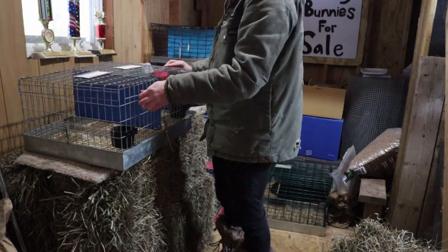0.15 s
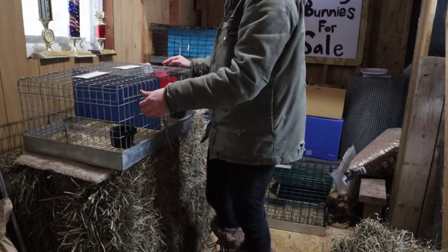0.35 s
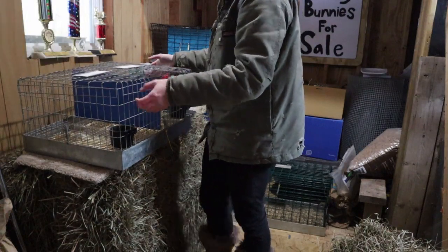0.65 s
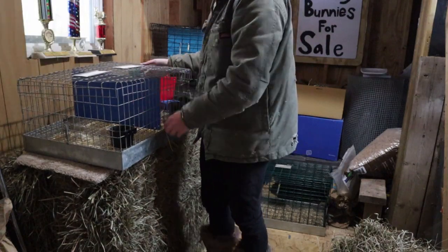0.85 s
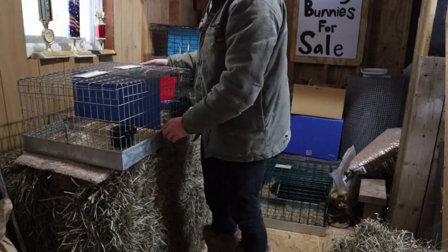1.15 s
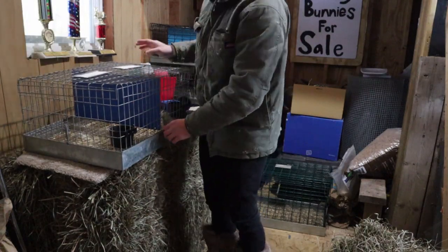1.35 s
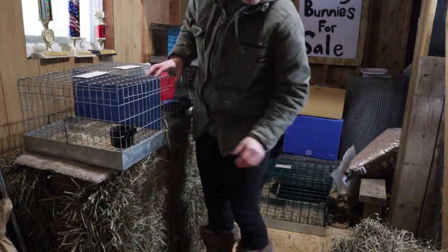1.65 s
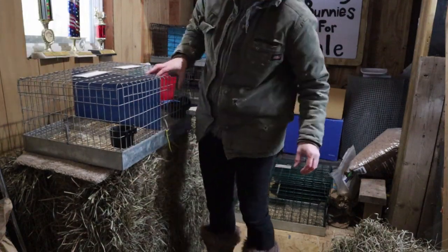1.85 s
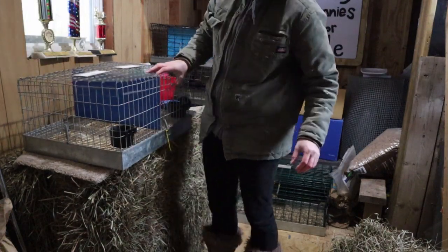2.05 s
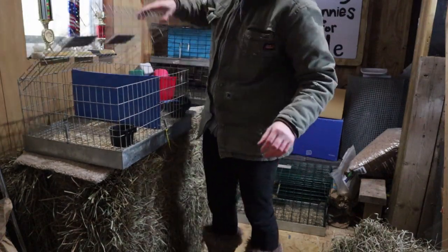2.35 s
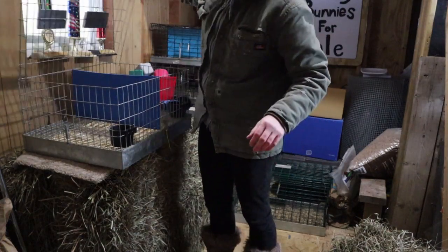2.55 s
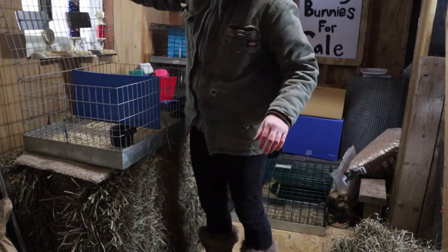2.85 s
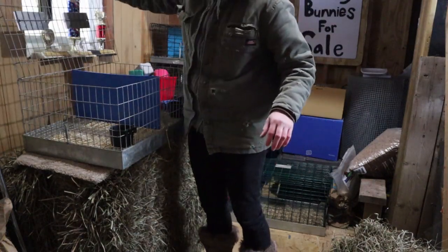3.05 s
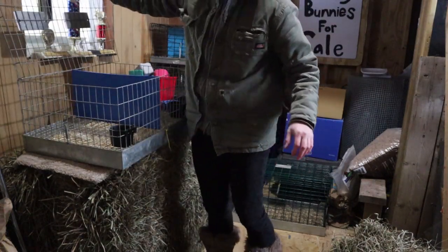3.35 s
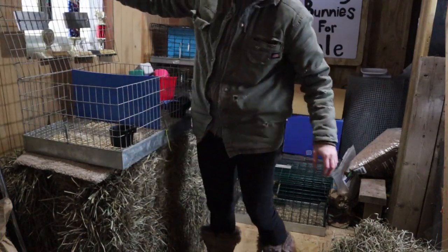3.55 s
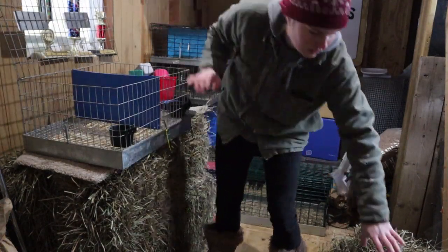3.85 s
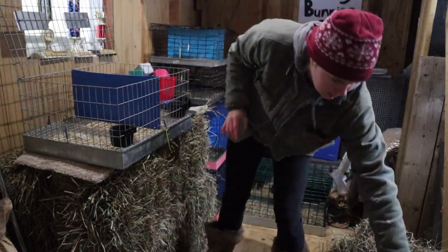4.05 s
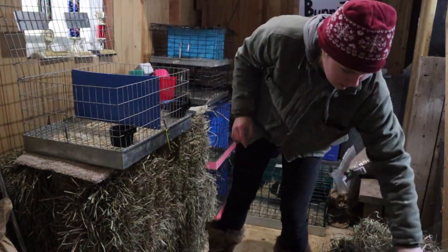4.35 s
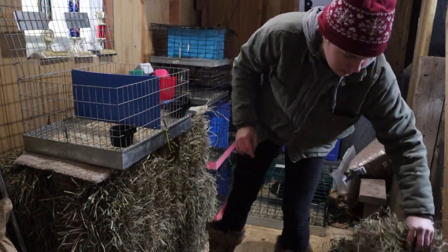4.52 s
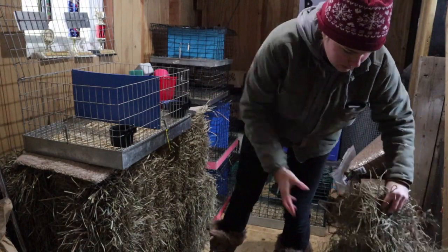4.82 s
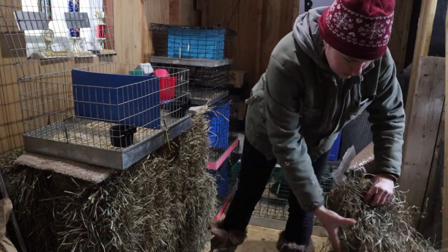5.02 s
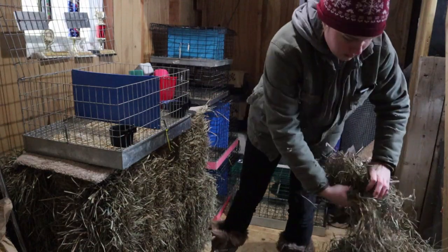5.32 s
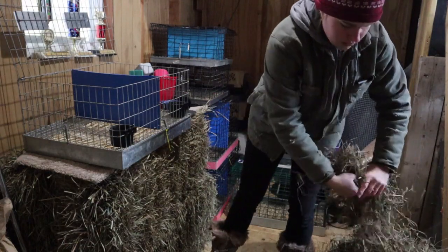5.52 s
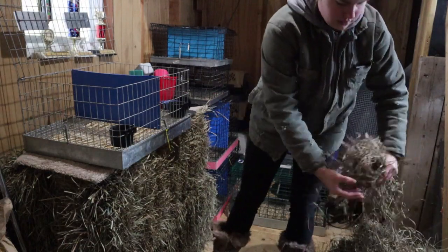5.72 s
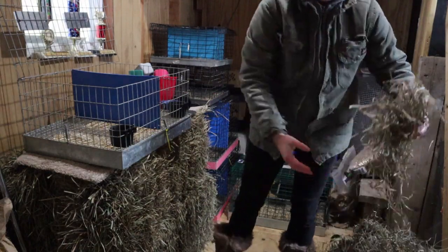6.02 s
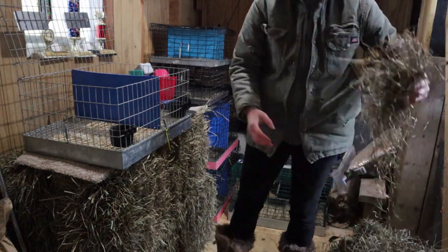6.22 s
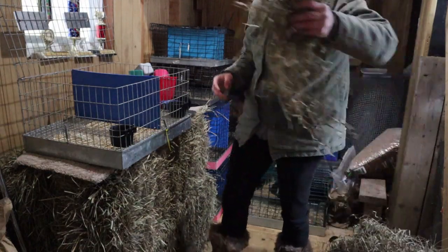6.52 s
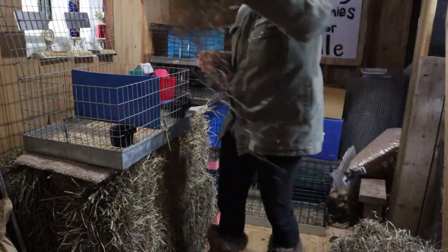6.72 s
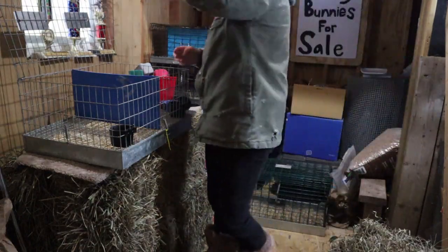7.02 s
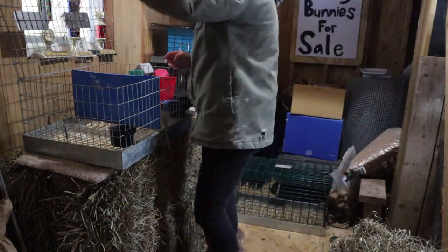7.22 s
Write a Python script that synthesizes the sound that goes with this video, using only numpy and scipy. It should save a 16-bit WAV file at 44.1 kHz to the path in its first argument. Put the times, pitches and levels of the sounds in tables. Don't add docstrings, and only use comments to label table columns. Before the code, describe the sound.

Close in a small wooden shed over a faint low hush, loose mesh clatters brightly, then quiets to small latch clacks. More wire rattling leads to one loud boomy bang of the lid against boards. Boots shift dully, a hand grips hay and tears it with dense dry fizz, twice, before faint stalk rustles, clicks and floor thuds. Wide stereo treble, mostly centred bass, short room decay.

```python
import sys
import numpy as np
from scipy import signal
from scipy.fft import rfft, irfft, next_fast_len
from scipy.io import wavfile
from scipy.ndimage import uniform_filter1d

SR = 44100
rng = np.random.default_rng(int(sys.argv[2]) if len(sys.argv) > 2 else 0)


def wav_out(sig):
    wavfile.write(sys.argv[1], SR, np.round(np.clip(np.atleast_2d(sig).T, -1, 1) * 32767).astype(np.int16))


def gain_from_db(level_db):
    decades = np.asarray(level_db, float) / 20
    return 10 ** decades


N = 325458


def evened(x):
    return x / np.sqrt(np.mean(x ** 2, axis=-1, keepdims=True) + 1e-20)


def read(points, hz):
    f, value = np.transpose(points)
    return np.interp(np.log(hz + 1), np.log(f + 1), value)


def coloured(x, points, turn=0.):
    size = next_fast_len(N)
    gain = gain_from_db(read(points, np.fft.rfftfreq(size, 1 / SR)))
    return irfft(rfft(x, size) * gain * np.exp(1j * turn), size)[..., :N]


def ring(x, hz, width):
    r = np.exp(-np.pi * width / SR)
    turn = 2 * np.pi * hz / SR
    return signal.lfilter([np.sin(turn) * 2 * np.sqrt(1 - r)], [1, -2 * r * np.cos(turn), r * r], x)


def swell(s, db, t60, rise):
    t = np.maximum(np.arange(N) / SR - s, 0)
    decay = gain_from_db(db - 60 * t / max(t60, .01))
    onset = 1 - np.exp(-t / max(rise, 1e-4))
    contact = 1 + 0.24 * np.exp(-t / 0.0018)
    return decay * onset * contact


def random_hits(per_s, spread_db):
    return gain_from_db(spread_db * np.minimum(rng.exponential(1, N), 5)) * (rng.random(N) < per_s / SR)


def chatter(per_s, spread_db, bed):
    bursts = evened(signal.lfilter([1], [1, -.975], random_hits(per_s, spread_db)))
    return evened((bed + bursts) * rng.standard_normal((2, N)))


def wander(depth_db, size):
    chance = uniform_filter1d(uniform_filter1d(rng.standard_normal(N), size), size)
    return gain_from_db(depth_db * np.tanh(evened(chance)))


def patchy(x, depth_db, size=512):
    z = signal.stft(x, nperseg=size)[2]
    chance = rng.standard_normal(z.shape)
    patches = uniform_filter1d(uniform_filter1d(chance, size=3, axis=1), size=4, axis=2)
    return signal.istft(z * gain_from_db(depth_db * patches / patches.std()), nperseg=size)[1][:, :N]


def struck(s, modes, rise):
    t = np.arange(N) / SR - s
    out = np.zeros((2, N))
    at = slice(round(s * SR), round(s * SR) + SR)
    for hz, db, t60 in modes:
        start = rng.random((2, 1)) * [[.1], [1]]
        out[:, at] += swell(s, db, t60, rise)[at] * np.sin(2 * np.pi * (hz * t[at] + start))
    return out


# frequency in Hz, side over mid in dB.
WIDE = [(60, -57), (150, -30), (300, -15), (550, -9.5), (1000, -4), (2000, 1.5), (4000, 5), (9000, 7.5),
        (12000, 8), (15500, 3.5)]


def ports(pair, aim, turn, wide=WIDE):
    aim = np.clip(aim, 0, 1)
    side = aim * coloured(pair[0], wide, turn) + np.sqrt(1 - aim ** 2) * coloured(pair[1], wide)
    return np.array([pair[0] + side, pair[0] - side])


# start in seconds, tray ring in dB, wire jingle in dB over ring,
# 60 dB decay in seconds.
JOLTS = [
    (0.1135, -10.5, -3.5, 0.21),
    (0.168, -25, -9, 0.26),
    (0.889, -39.5, -15.5, 0.49),
    (0.947, -27, -29, 0.063),
    (1.729, -21, -10.5, 0.34),
    (1.799, -29, -18, 0.39),
    (1.989, -25.5, -14, 0.41),
    (2.215, -23, -18, 0.25),
    (2.639, -40.5, -14, 0.35),
]
# start in seconds, tray ring in dB, wire jingle in dB over ring.
SHAKES = [(0.004, -33, -30), (0.057, -23, -16), (0.081, -18.5, -13), (0.098, -20, -3), (0.134, -14.5, -8),
          (0.209, -22, -19), (0.243, -22, -15.5), (0.279, -34.5, -14), (0.529, -39.5, -10),
          (1.68, -50.5, 5.5), (1.769, -28, -9), (2.029, -25.5, -33), (2.131, -23, -14.5), (2.24, -27.5, -4),
          (2.27, -22.5, -6.5), (2.291, -30, -8), (2.399, -34, -13), (2.469, -58, 9.5), (2.53, -61, 13),
          (2.59, -58.5, 9), (2.679, -36.5, -31), (2.995, -16, -8), (3.027, -42, -15), (7.317, -40, -17)]
# frequency in Hz, width in Hz, level in dB.
TRAY = [(546, 38, -2.5), (659, 100, -2), (840, 190, -6), (1564, 38, -10), (1101, 34, -1.5),
        (1150, 110, -6.5)]
# frequency in Hz, width in Hz, level in dB.
WIRE = [(3250, 56, -7), (4160, 60, -8), (4530, 60, -11), (5020, 42, -8), (5680, 170, -3), (5920, 52, -9),
        (6960, 130, -6), (7280, 56, -9), (7940, 82, -6), (8440, 47, -8), (9640, 87, -7), (10200, 63, -8),
        (10500, 71, -6), (10900, 43, -7), (11500, 61, -12), (11800, 51, -8), (12100, 71, -11),
        (12500, 52, -15)]
# frequency in Hz, level in dB.
SHEET = [(120, -6), (250, 3), (500, 17), (900, 9), (1400, -0.5), (2000, -34)]
# frequency in Hz, level in dB.
CLACK = [(250, -69), (450, -43), (900, 2.5), (1800, 4), (3000, -5), (4200, -23.5)]
# frequency in Hz, level in dB.
JINGLE = [(1900, -42), (3200, -9.5), (4500, 2), (5600, -0.5), (6500, -0.5), (9500, -4.5), (11800, -14.5),
          (12700, -14), (13400, -36), (15500, -62)]


def cage():
    jolt_rise_s, shake_rise_s, shake_t60_s = 0.0097, 0.021, 0.3
    clack_db, clack_per_jingle = -1.5, 0.63
    tray, clack, jingle = np.zeros((3, N))
    moves = [(*row, jolt_rise_s) for row in JOLTS]
    moves += [(*row, shake_t60_s, shake_rise_s) for row in SHAKES]
    for s, db, jingle_db, t60, rise in moves:
        tray += swell(s, db - 12.0, t60, rise) ** 2
        if abs(s - BANG[0][0]) > .1:
            clack += swell(s, db + clack_db + clack_per_jingle * jingle_db - 3.5, t60, rise) ** 2
        jingle += swell(s, db + jingle_db - 4.5, 0.7 * t60, 0.89 * rise) ** 2
    drive = chatter(820, 1.0, bed=10.0)
    pan = gain_from_db(-6.0) * evened(coloured(drive, SHEET)) * np.sqrt(tray)
    for hz, width, db in TRAY:
        pan += gain_from_db(db - 5) * ring(drive * np.sqrt(tray) * wander(2.9, size=400), hz, width)
    wires = np.zeros((2, N))
    for hz, width, db in WIRE:
        wires += gain_from_db(db - 7) * ring(drive * np.sqrt(jingle) * wander(6, size=700), hz, width)
    mesh = evened(coloured(drive, CLACK)) * np.sqrt(clack)
    mesh += gain_from_db(1.0) * evened(coloured(drive, JINGLE)) * np.sqrt(jingle)
    return ports(pan + wires + mesh, 0.28, 1.23)


# start in seconds, level in dB.
BANG = [
    (2.987, 0),
]
# frequency in Hz, level in dB, 60 dB decay in seconds.
WALL = [(85.9, -22, 0.89), (111, -17.5, 0.69), (125.6, 3.5, 0.306), (149, 10, 0.125), (162, 0, .22),
        (175.5, -13, 0.31), (186.7, 1.5, 0.23), (224, -18, 0.63), (235.6, -8.5, 0.43), (291.3, 4, 0.2),
        (316, -16.5, 0.64), (357, -15, 0.37), (447, -16, 0.44), (2500, -23, 0.41), (496, -10, 0.25),
        (639, -6, 0.16), (800, -9, 0.12)]
# frequency in Hz, level in dB.
SLAP = [(180, -21), (300, -10), (364, -13.5), (649, -19), (726, -20), (813, -17.5), (2390, -23),
        (2990, -26), (9830, -43), (12100, -60), (14000, -94)]
# frequency in Hz, 60 dB decay in seconds.
SLAP_T60 = [(300, 0.47), (1000, 0.32), (2500, 0.28), (6000, 0.27), (12000, 0.17)]


def bang():
    s, db = BANG[0][0] + 0.00188, BANG[0][1]
    out = struck(s + 0.00019, [(hz, db + d - 12.0, t60) for hz, d, t60 in WALL], 0.0078)
    slap = coloured(rng.standard_normal((2, N)), SLAP)
    for hz in np.geomspace(300, 12000, num=9):
        split = signal.butter(2, [hz / 1.206, hz * 1.23], "bandpass", fs=SR, output="sos")
        out += signal.sosfilt(split, slap) * swell(s, db + 12.5, read(SLAP_T60, hz), 0.0011)
    return ports(out, 0.15, 2.0)


# start in seconds, level in dB, clack in dB over knock,
# hiss in dB over knock.
LATCHES = [
    (0.714, -41, 6, -20),
    (1.042, -34.5, 11, -6.5),
    (1.049, -32, 0, -17),
    (1.086, -41, -11, -41),
    (1.226, -39, 3, -18),
    (1.604, -34.5, 2, -34),
]
# start in seconds, level in dB, pitch in Hz, hiss in dB over knock.
KNOCKS = [(3.463, -37.5, 1100, -27), (3.469, -28, 650, -34), (3.507, -43, 620, -22),
          (3.605, -39.5, 645, -14), (3.773, -39, 520, -18), (3.904, -35.5, 447, -13.5),
          (3.84, -39.5, 890, -30), (3.98, -39, 800, -28), (4.2, -33, 400, -30), (4.3, -37, 340, -30),
          (6.252, -37, 800, -23), (6.272, -41, 930, -20), (6.336, -53, 1280, 11), (6.488, -39.5, 840, -38),
          (6.53, -41, 880, -36), (6.688, -33, 600, -18), (6.805, -47, 605, -9), (6.919, -48, 405, -6),
          (7.086, -46.5, 1040, 11), (7.229, -66, 428, 19)]


def knocks():
    latch_hz, latch_t60_s, knock_t60_s, rise_s = 573, 0.2, 0.21, 0.0079
    scuff_db, scuff_per_hiss = 4, 0.41
    edge = 1
    drive = chatter(540, 1.4, bed=2.0)
    clack, hiss = evened(coloured(drive, CLACK)), evened(coloured(drive, JINGLE))
    body = evened(coloured(drive, SHEET))
    out = np.zeros((2, N))
    rows = [(s, db, latch_hz, clack_db, hiss_db, latch_t60_s) for s, db, clack_db, hiss_db in LATCHES]
    for s, db, hz, hiss_db in KNOCKS:
        rows.append((s, db, hz, scuff_db + scuff_per_hiss * hiss_db, hiss_db, knock_t60_s))
    for s, db, hz, clack_db, hiss_db, t60 in rows:
        at = slice(round(s * SR), round(s * SR) + SR // 2)
        blow = swell(s, db - 8, t60, rise_s * gain_from_db(-edge * max(hiss_db, 0)))[at]
        surface = 0.12 * body[:, at] + gain_from_db(clack_db) * clack[:, at] + gain_from_db(hiss_db) * hiss[:, at]
        out[:, at] += ring(drive[:, at] * blow, hz, 92) + blow * surface
    return ports(out, 0.32, 1.6)


# start in seconds, # level in dB,
# pitch in Hz, bright crack in dB, 60 dB decay in seconds.
TICKS = [(0.713, -31.5, 3920, -34, 0.15), (0.714, -31, 1500, -34, 0.065), (0.9498, -26, 1010, -30, .025),
         (1.03, -28, 2130, -44, 0.052), (1.029, -42, 7500, -40, 0.021), (1.046, -33, 12000, 0, .03),
         (1.223, -47, 9000, -4, 0.065), (0.114, -4, 1700, -6, 0.036), (0.119, -12, 5670, -11, 0.05),
         (0.134, -21, 4300, -8, .02), (0.148, -15, 2500, -8, 0.018), (1.735, -32, 2080, -8, .03),
         (1.777, -29, 3000, -8, .02), (1.991, -29, 5840, -10, 0.037), (2.148, -40, 1800, -5, .04),
         (2.224, -21, 1520, -12, .03), (2.9885, -1, 1400, -36, 0.053), (2.992, -22.5, 5660, -28, 0.29),
         (2.245, -21, 1600, -10, 0.022), (2.29, -31, 2800, -8, .02), (2.312, -34, 1800, -8, .02),
         (3.468, -44, 4000, -22, 0.48), (3.61, -53, 9000, -4, 0.018), (3.784, -29, 8000, -4, .015),
         (3.904, -35, 4500, -13, .02), (4.114, -30, 2200, -15, .04), (4.487, -32, 4800, -14, .05),
         (6.332, -21.5, 1960, 1.5, 0.016), (6.337, -29, 12000, -3, .012), (6.553, -40, 2340, -4, .015),
         (6.693, -27, 1090, -30, 0.027), (6.728, -33, 10600, -2, .015), (6.809, -32, 1300, -22, 0.061),
         (6.892, -39, 10000, -4, 0.036), (6.955, -32, 3250, -2, .015), (7.073, -38, 11300, -6, .012),
         (7.088, -43, 7000, 0, .02), (7.097, -41, 5200, -8, 0.022), (7.227, -41, 3300, 0, .015),
         (0.122, -17, 7500, -6, 0.018), (0.139, -20, 1300, -10, 0.018), (0.158, -18, 2200, -8, .02),
            (0.183, -28, 1500, -8, 0.018), (1.052, -24, 1900, -14, .04), (1.076, -30, 1700, -14, .03),
            (1.09, -30, 2200, -14, .03), (1.805, -35, 2200, -8, .02), (2.217, -26, 900, -14, .03),
            (0.119, -6, 1400, -10, 0.036), (0.147, -12, 800, -14, .04), (1.732, -30, 13000, -3, 0.097),
            (1.99, -40, 13500, -5, .05), (1.223, -50, 13000, -6, .06), (1.044, -22, 1800, -14, 0.033),
            (2.125, -44, 12000, -4, .08), (3.0, -23, 3600, -16, 0.16), (3.471, -26, 670, -33, .05),
            (4.092, -36, 1870, -25, 0.086), (4.128, -23, 1700, -25, 0.087), (4.15, -28, 1900, -25, .06),
            (6.692, -38, 1800, -25, 0.018), (0.1, -20, 9500, -4, .04), (0.118, -10, 10800, -4, .05),
            (7.248, -39, 3700, 0, .012), (7.277, -36, 9800, -8, .015)]
# frequency in Hz, level in dB.
CRACK = [(1900, -41), (3200, -6), (4500, -1), (6500, -3), (9500, -3), (12500, -8), (14000, -26),
         (15500, -41)]


def ticks():
    drive, out = rng.standard_normal((2, N)), np.zeros((2, N))
    bright = evened(coloured(drive, CRACK))
    for s, db, hz, crack_db, t60 in TICKS:
        at = slice(round(s * SR), round(s * SR) + SR // 4)
        snap = swell(s, db - 14.0, t60, 0.00043)[at]
        out[:, at] += ring(drive[:, at] * snap, hz, 0.35 * hz) + gain_from_db(crack_db) * snap * bright[:, at]
    return ports(out, 0.38, 0.67)


# start in seconds, level in dB, pitch in Hz,
# 60 dB decay in seconds.
PINGS = [(0.067, -37, 1100, 0.22), (0.083, -25.5, 1060, 0.077), (0.116, -15, 1088, 0.13),
         (0.118, -15, 5540, 0.082), (0.128, -25, 5770, 0.19), (0.118, -25, 1900, 0.14),
         (0.12, -30, 1500, 0.15), (0.121, -28, 4200, 0.17), (0.173, -23, 1084, 0.058),
         (0.266, -41, 2230, 0.13), (0.325, -43, 1084, 0.11), (0.53, -59, 5720, .4), (1.052, -39, 1900, .15),
         (1.056, -56, 2310, .15), (1.738, -31, 1110, 0.18), (1.74, -39, 2105, 0.14),
         (1.995, -33.5, 529.5, 0.29), (1.996, -37, 1092, .3), (1.999, -46, 3230, .2),
         (2.157, -37, 1117, .15), (2.214, -31, 530, .12), (2.305, -30, 1104, .1), (2.352, -41, 1136, .15),
         (2.238, -27.5, 1071, 0.22), (2.27, -42.5, 2790, 0.35), (2.288, -29, 1083, .12),
         (2.29, -37, 5900, .15), (2.52, -57, 5820, .4), (2.62, -56, 5700, 0.33), (2.63, -56, 7500, .3),
         (2.998, -33, 5920, 0.17), (3.114, -25, 171.7, 0.36), (3.12, -41.5, 521, 0.41),
         (3.876, -39, 303, 0.13), (4.093, -49.5, 519, .6), (4.113, -43, 1300, 0.18), (6.7, -49, 299, 0.13),
         (6.71, -43, 525, 0.18), (6.805, -46, 615, 0.11), (7.015, -47, 594, .1), (7.31, -53, 1068, 0.43),
         (7.34, -51, 520, .4), (6.49, -48, 840, 0.18), (6.694, -44, 1150, 0.09), (6.807, -44, 1313, 0.099),
         (6.6946, -25.5, 90, 0.061), (2.995, -25, 597, 0.13), (2.995, -30, 1162, 0.16),
         (2.225, -38, 1513, .2), (2.28, -41, 1930, 0.23), (0.2, -47, 800, 0.14), (0.949, -43, 800, 0.05)]


def pings():
    out = np.zeros((2, N))
    for s, db, hz, t60 in PINGS:
        out += struck(s, [(hz, db, t60), (1.1 * hz, db - 9.5, t60)], 0.0018)
    return ports(out, 0.25, 1.3)


# start in seconds, level in dB, pitch in Hz, upper modes in dB.
THUDS = [(0.079, -47, 157, -10), (0.119, -21.5, 161, -1), (0.219, -31, 161.5, 1.5),
         (0.713, -25.5, 155, 3.5), (0.789, -32.5, 53, 2.5), (1.765, -36, 77, 9), (1.809, -25, 83.4, 1),
         (1.915, -26, 66, 0), (1.999, -39.5, 162, 5), (2.155, -43, 172, 15), (2.25, -40, 51.7, 7),
         (2.637, -40.5, 185, 7.5), (3.099, -33, 132, -10), (3.25, -33, 109, 3.5), (3.608, -39, 76, 6),
         (3.783, -24.5, 67.5, -24), (3.87, -25, 92.5, -4), (3.938, -35, 93, -19), (4.192, -37, 77.5, 6.5),
         (4.3, -44, 192, 0), (4.38, -30.5, 173.4, -2.5), (4.558, -43.5, 164, 4), (6.146, -44, 127, -12),
         (6.301, -51, 192, 12), (6.498, -48.5, 103, 8), (6.706, -19.5, 88, -13), (6.758, -25, 91.5, -23),
         (6.81, -33, 143, -15), (6.915, -30.5, 84.5, -5.5), (7.031, -41, 80, -23), (7.248, -38.5, 127, -15)]
# frequency in Hz, level in dB.
BOARDS = [(83, 3), (128, 0.5), (165, 4), (190, 1.5), (228, -1.5), (295, -4)]


def boards():
    t60_s = 0.21
    damping = .15
    out = np.zeros((2, N))
    for s, db, hz, upper_db in THUDS:
        t60 = t60_s * gain_from_db(-damping * (db + 29.5))
        upper = [(f, db + upper_db + d - 16.0, 1.7 * t60) for f, d in BOARDS]
        out += struck(s, [(hz, db - 3.5, t60)] + upper, 0.0039)
    return ports(out, 0.296, 2.3)


# time in seconds, effort in dB.
GRAB = [
    (4.07, -80),
    (4.172, -37),
    (4.19, -35),
    (4.26, -36.5),
    (4.408, -30.5),
    (4.662, -30),
    (4.75, -32.5),
    (4.864, -31),
    (4.908, -35.5),
]
# time in seconds, effort in dB.
TEAR = [
    (5.076, -39.5),
    (5.33, -34),
    (5.472, -36),
    (5.694, -32.5),
    (5.72, -36),
    (5.804, -34.5),
    (5.918, -46),
    (6.0, -54),
    (6.1, -80),
]
# time in seconds, level in dB.
STIR = [(0.0, -70), (0.24, -62.5), (0.68, -80), (1.64, -67), (1.87, -63.5), (2.21, -61), (2.5, -62.5),
        (2.8, -67), (3.3, -73), (3.57, -78), (3.72, -62), (3.85, -62.5), (4.05, -64), (6.0, -49),
        (6.338, -53), (6.884, -56.5), (7.38, -56.5)]
# start in seconds, level in dB.
BRUSHES = [
    (3.495, -68),
    (3.606, -72),
    (3.763, -52),
]
# frequency in Hz, level in dB.
STRAW = [(2200, -13.5), (4220, -5.5), (6500, -5.5), (9000, -5.5), (11100, -1), (12600, -8.5),
         (14600, -15.5), (15800, -18)]
# frequency in Hz, level in dB.
BUNDLE = [(100, -30), (200, -15.5), (500, -5), (1000, -5.5), (2000, 0), (3500, -4.5), (5500, -21)]


def stalks():
    clumps = wander(3.5, size=500)
    snaps = np.zeros((2, N))
    for hz in np.geomspace(900, 15000, num=16):
        u = np.arange(-3 * SR // hz, 3 * SR // hz + 1) * hz / SR
        grain = hz * np.exp(-u ** 2 / 0.8) * np.cos(2 * np.pi * u)
        hits = random_hits(900 * clumps, 0.61) * rng.standard_normal((2, N))
        snaps += signal.oaconvolve(hits, grain[None], "same")
    crackle = evened(patchy(evened(snaps) + 1.98 * rng.standard_normal((2, N)), depth_db=1.5))
    breaks = signal.lfilter([1], [1, -.97], random_hits(260 * clumps, 2.6)) * rng.standard_normal((2, N))
    return evened(patchy(crackle + gain_from_db(-15.5) * evened(breaks), depth_db=2.0, size=4096))


def hay():
    t = np.arange(N) / SR
    crackle = stalks()
    pull = gain_from_db(np.interp(t, *np.transpose(GRAB + TEAR), left=-np.inf, right=-np.inf))
    stir = gain_from_db(np.interp(t, *np.transpose(STIR)))
    for s, db in BRUSHES:
        stir += swell(s, db, 0.2, 0.0065)
    fizz = np.hypot(pull, stir * wander(1.9, size=600)) * evened(coloured(crackle, STRAW))
    loose = stir * gain_from_db(np.where(t < GRAB[-1][0], 3, -6))
    plunge = swell(4.085, -38.5, 2.3, 0.078)
    effort = np.sqrt((pull * gain_from_db(-13)) ** 2 + loose ** 2 + plunge ** 2)
    body = effort * evened(coloured(crackle, BUNDLE))
    return ports(fizz + body, 0.19, -2.9)


# frequency in Hz, level in dB.
AIR = [(13, -22), (22, 7), (54, 2), (101, -3), (175, -0.5), (264, -7), (508, -6), (786, -10), (1090, -11.5),
       (8690, -33.5), (10800, -44), (12100, -69), (15000, -80)]
# frequency in Hz, side over mid in dB.
AIR_WIDE = [(30, -22), (150, -5), (300, 2.5), (600, 1), (2000, 5.5), (10000, 5)]


def air():
    frames, hz = N // 256 + 5, np.fft.rfftfreq(1024, 1 / SR)
    a, b, c, d, patches = rng.standard_normal((frames, 513, 5)).T
    patches = uniform_filter1d(uniform_filter1d(patches, 8, 0), 14, 1)
    depth_db = 1.3 * np.minimum(hz / 150, 1)[:, None]
    z = np.array([a + 1j * b, c + 1j * d]) * gain_from_db(depth_db * patches / patches.std())
    hush = coloured(signal.istft(z, nperseg=1024, noverlap=768)[1][:, :N], AIR)
    return ports(gain_from_db(-51.5 + 1.0) * evened(hush), 0.12, 2.2, AIR_WIDE)


def scene():
    return cage() + bang() + knocks() + ticks() + pings() + boards() + hay() + air()


def spare_top(x, under_db):
    split = signal.firwin(401, 12700, window=("kaiser", 10), fs=SR, pass_zero=False)
    top = signal.oaconvolve(x, split[None], "same")
    rest = signal.sosfilt(signal.butter(2, 280, "highpass", fs=SR, output="sos"), x)
    top_power, rest_power = (abs(uniform_filter1d((v ** 2).mean(0), size=1000)) for v in (top, rest))
    over_db = 10 * np.log10(top_power + 1e-14) - 10 * np.log10(rest_power + 1e-14)
    kept = .5 + .5 * np.tanh((over_db + under_db) / 3)
    return x - (1 - kept) * top


def starved(x):
    low_hz, high_hz, share, from_db = 4200, 9000, .1, -43
    mid, side = (x[0] + x[1]) / 2, (x[0] - x[1]) / 2
    hz, _, z = signal.stft(mid, SR, nperseg=1024, noverlap=768)
    dice = rng.random((len(hz) // 4 + 1, z.shape[1] // 8 + 1))
    strips = np.kron(dice, np.ones((4, 8)))[:len(hz), :z.shape[1]]
    loud = 10 * np.log10((abs(z) ** 2).sum(0) + 1e-14) > from_db
    spent = signal.lfilter(np.ones(48) / 48, [1], loud)
    skip = strips < share * (1 + 6 * spent * (1 - spent))
    inside = (hz > low_hz) & (hz < high_hz)
    gain = 1 - .95 * skip * loud * inside[:, None]
    mid = signal.istft(z * gain, SR, nperseg=1024, noverlap=768)[1][:N]
    return np.array([mid + side, mid - side])


def roll_off(x):
    return signal.sosfilt(signal.butter(12, 15930, fs=SR, output="sos"), x)


def record(dry):
    ceiling = .85
    edge = signal.firwin(401, 15600, window=("kaiser", 10), fs=SR)
    firm = signal.sosfilt(signal.butter(2, 26, "highpass", fs=SR, output="sos"), dry)
    limited = signal.oaconvolve(ceiling * np.tanh(firm / ceiling), edge[None], "same")
    mix = starved(spare_top(limited, under_db=20.5))
    return roll_off(mix)


dry = scene()
out = record(dry)
wav_out(out)
```